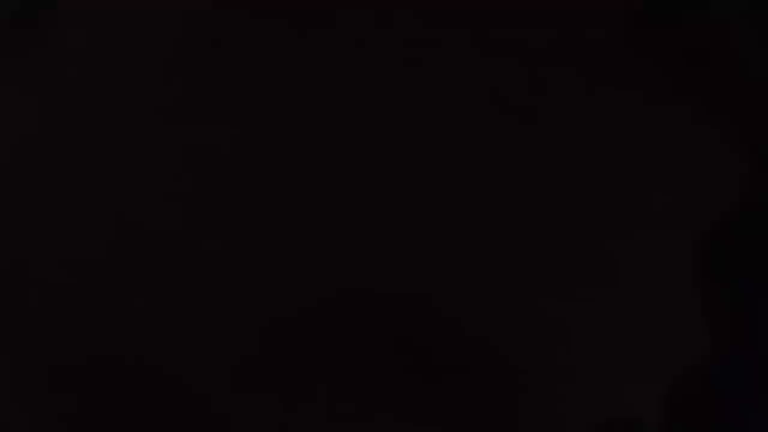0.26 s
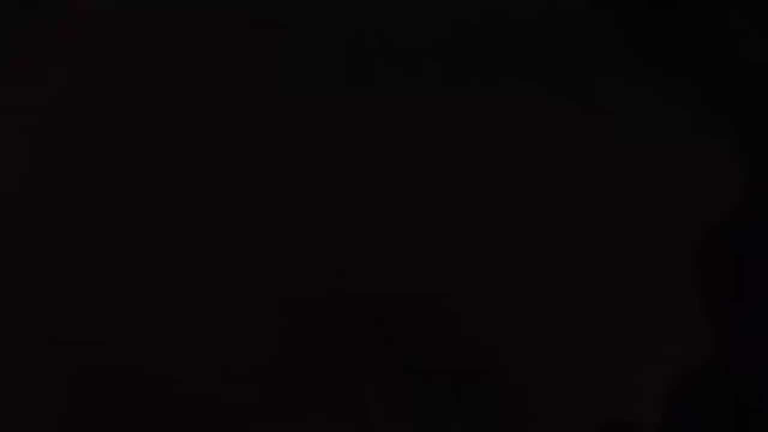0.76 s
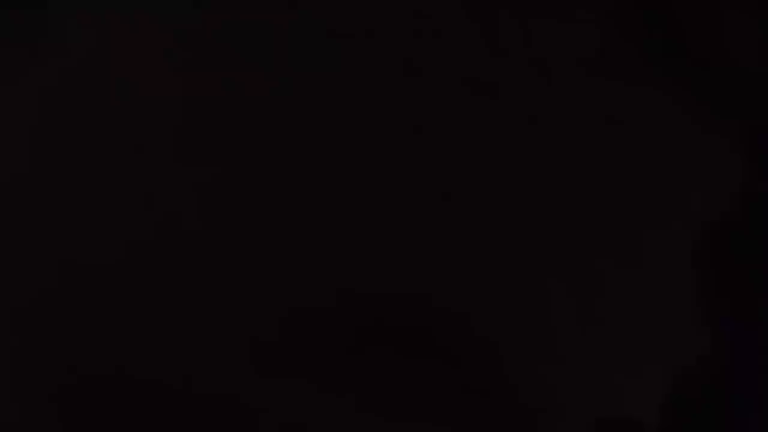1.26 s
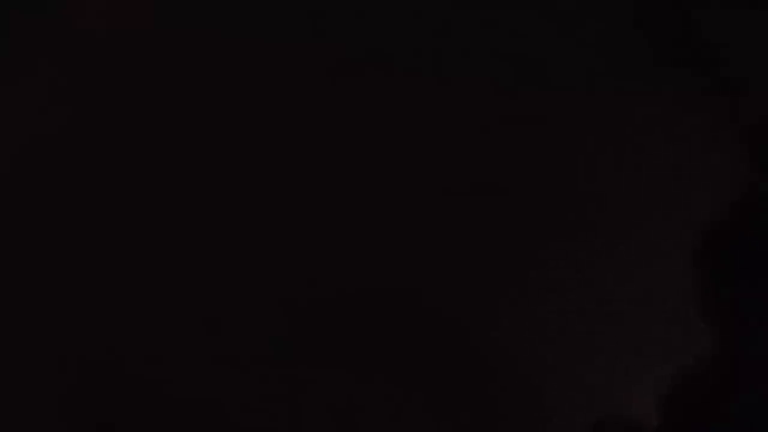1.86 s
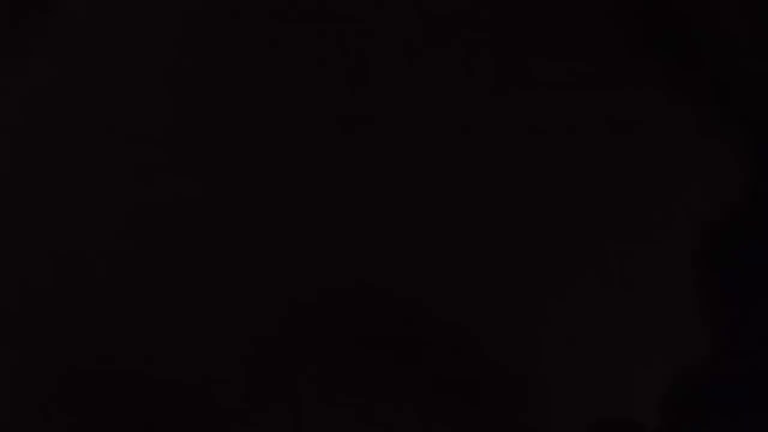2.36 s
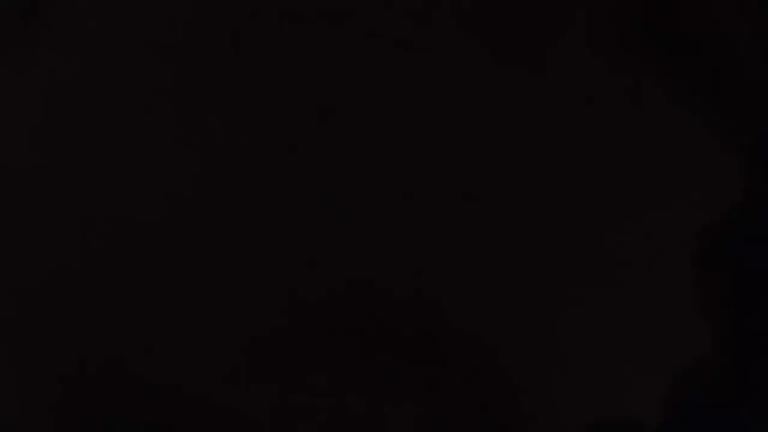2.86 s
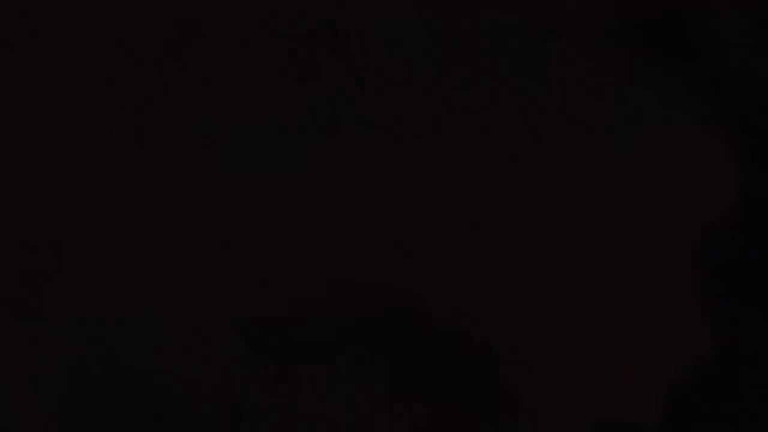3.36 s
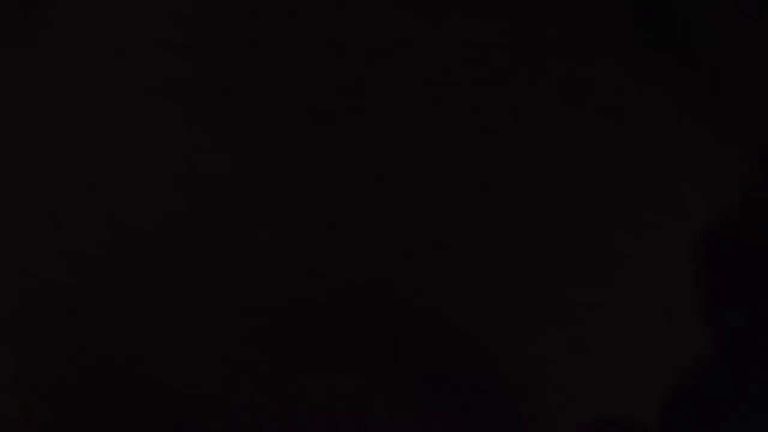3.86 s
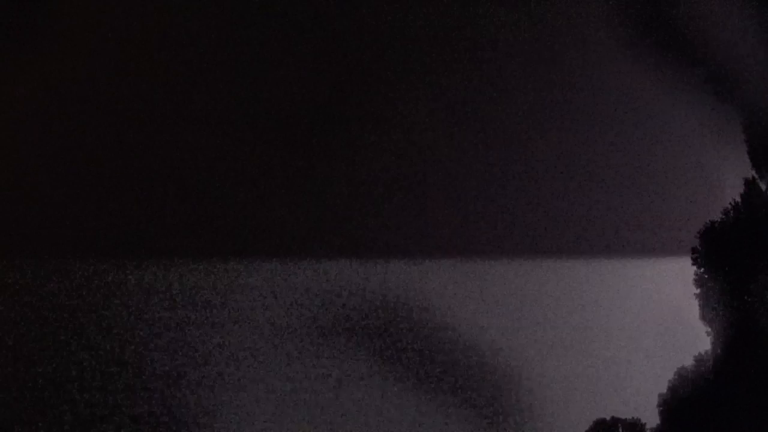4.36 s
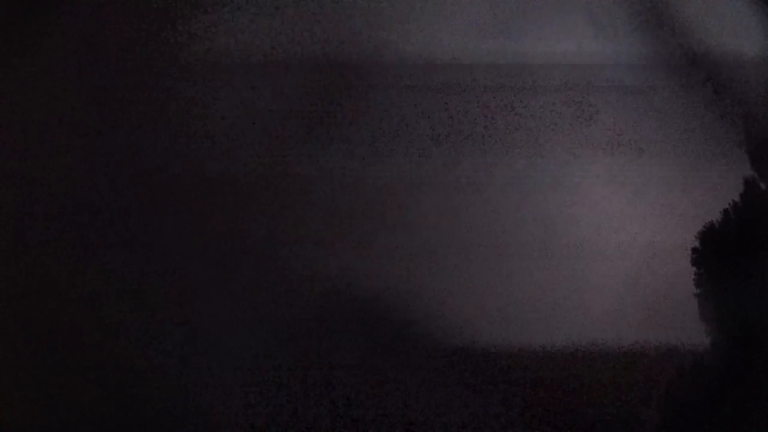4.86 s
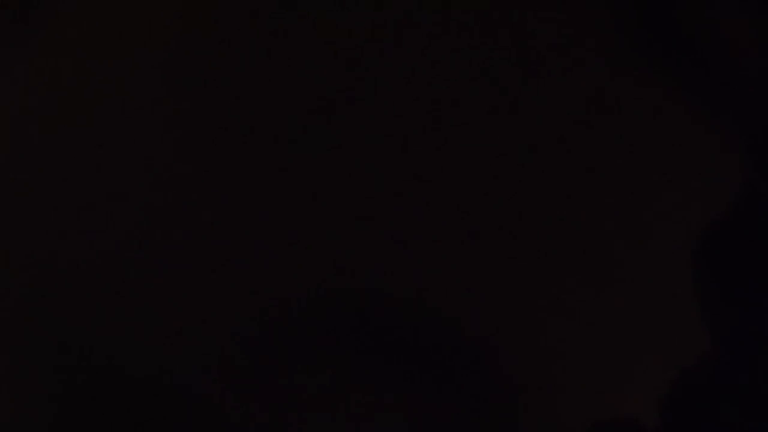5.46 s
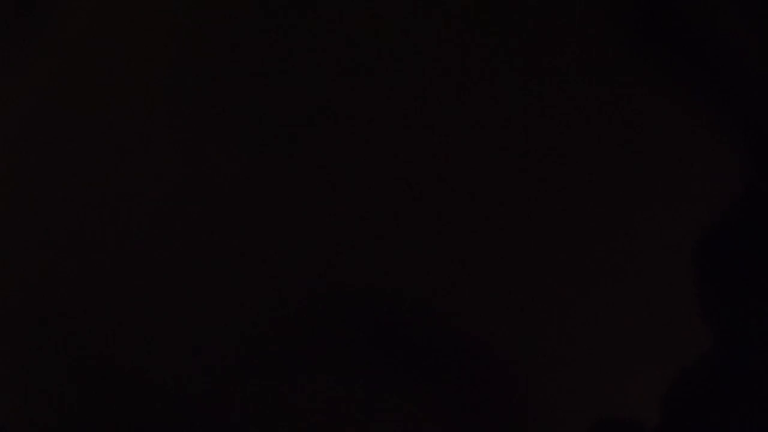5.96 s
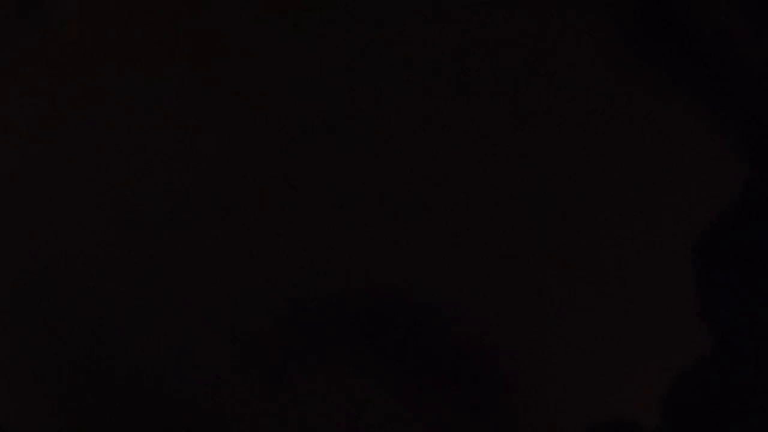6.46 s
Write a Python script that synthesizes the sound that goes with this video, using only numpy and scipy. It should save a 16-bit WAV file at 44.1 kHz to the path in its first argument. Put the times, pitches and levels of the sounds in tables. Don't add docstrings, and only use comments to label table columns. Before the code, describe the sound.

Outdoors at night under a small shelter, steady rain hisses evenly. Deep distant thunder rolls in soft, overlapping surges. Stray drops tick sharply, knock on a hollow panel, and thump the microphone, hard at about one second. After five seconds the thunder comes nearer, growling and crackling, still going when the sound stops with another hard drop thump.

```python
import sys
import numpy as np
from scipy import signal
from scipy.fft import rfft, irfft, next_fast_len
from scipy.io import wavfile
from scipy.ndimage import uniform_filter1d, map_coordinates

SR = 44100
rng = np.random.default_rng(int(sys.argv[2]) if len(sys.argv) > 2 else 0)


def gain_from_db(level_db):
    decades = np.asarray(level_db, float) / 20
    return 10 ** decades


def generate_wav(signal):
    frames = np.transpose(np.atleast_2d(signal))
    scaled = np.clip(frames, -1, 1) * 32767
    pcm = np.round(scaled).astype(np.int16)
    wavfile.write(sys.argv[1], SR, pcm)


N = 296352
BAND_LIMIT_HZ = 11065


def unit(x):
    return x / np.sqrt(np.mean(x ** 2) + 1e-20)


def along(points, hz):
    f, v = np.transpose(points)
    return np.interp(np.log(hz + 1), np.log(f + 1), v)


def curves(rows):
    s, *cols = np.transpose(rows)
    t = np.arange(N) / SR
    return [np.interp(t, s, c) for c in cols]


def wobble(rate):
    knots = rng.standard_normal(int(N * rate / SR) + 4)
    return map_coordinates(knots, [np.arange(N) * rate / SR])


def filtered(x, response):
    m = next_fast_len(N + SR // 2)
    hz = np.fft.rfftfreq(m, 1 / SR)
    return irfft(rfft(x, m) * response(hz), m)[..., :N]


def band_limit(hz):
    return 1 / (1 + (hz / BAND_LIMIT_HZ) ** 90)


def impacts(rate, spread_db, hush):
    chance, sign, size = rng.random((3, 2, N))
    size_db = spread_db * np.minimum(-np.log(1 - size), 3)
    train = (chance < rate / SR) * np.sign(sign - .5) * gain_from_db(size_db)
    hush = np.clip(hush, 0, 1)
    return np.sqrt(1 - hush) * unit(train) + np.sqrt(hush) * rng.standard_normal((2, N))


# (frequency [Hz], left-right likeness [0-1])
COHERENCE = [(60, 0.91), (110, 0.98), (190, 0.91), (350, 1), (630, 0.7), (1120, 0.29), (2020, 0.59),
             (3630, 0.88), (6520, 0.58), (11700, 1)]
# (frequency [Hz], lead of the left [rad])
PORT_LEAD = [(50, -0.11), (120, 0.04), (430, -1.22), (1460, -0.31), (2200, -1.15), (3800, -0.78),
             (10000, 0.9)]
# (frequency [Hz], left over right [dB])
PORT_TILT = [(60, -2), (110, -2.5), (190, -2.0), (350, -0.5), (630, -2.5), (1120, -2), (2020, -0.5),
             (3630, -2.5), (6520, -1.5), (11700, -0.5)]


def spread(pair, spectrum):
    def mid_side(hz):
        angle = np.arccos(np.clip(along(COHERENCE, hz), -1, 1)) / 2
        return gain_from_db(along(spectrum, hz)) * [np.cos(angle), np.sin(angle)]

    def ports(hz):
        half = gain_from_db(along(PORT_TILT, hz) / 2) * np.exp(.5j * along(PORT_LEAD, hz))
        return np.array([half, 1 / half])

    mid, side = filtered(pair, mid_side)
    return unit(filtered(np.array([mid + side, mid - side]), ports))


def add(out, s, sound):
    part = out[:, round(s * SR):][:, :sound.shape[1]]
    part += sound[:, :part.shape[1]]


def patchy(pair, depth_db, size):
    z = signal.stft(pair, nperseg=size)[2]
    field = uniform_filter1d(rng.standard_normal(z.shape[1:]), size=7, axis=0)
    field = uniform_filter1d(field, size=10, axis=1)
    return signal.istft(z * gain_from_db(depth_db * unit(field)), nperseg=size)[1][:, :N]


# (time [s], level [dB])
RAIN_LEVEL = [(0.0, -38), (1.29, -37.5), (4.51, -37.5), (6.31, -37), (6.72, -37)]
# (frequency [Hz], density [dB per Hz])
RAIN_SPECTRUM = [(180, -55), (300, -3.5), (334, -8.5), (377, -6.5), (473, -2.5), (630, -4), (701, -7.5),
                 (1340, -4), (1450, -3.5), (1900, -2.5), (2220, -2), (3140, -2.5), (8660, -10.5),
                 (10100, -14), (11200, -16.5), (14600, -78), (22000, -120)]


def rain():
    drops = patchy(impacts(1500, 6.5, hush=0.88), 0.62, size=256)
    hiss = filtered(spread(drops, RAIN_SPECTRUM), band_limit)
    return gain_from_db(curves(RAIN_LEVEL)[0] + 0.17 * wobble(14) + 3.0) * hiss


def splashes(rows, life, rise, gain_db):
    out, t = np.zeros((2, N)), np.arange(SR // 25) / SR
    for s, db, hz, pan_db, share in rows:
        t60 = life(hz)
        spray = rng.standard_normal((3, len(t)))
        phase = 2 * np.pi * hz * t + np.array([[.3], [-.3]])
        tone = np.sin(phase) + .3 * np.sin(.84 * phase) + .3 * np.sin(1.25 * phase)
        tone = tone + share * (spray[0] + .3 * spray[1:])
        fall = gain_from_db(-60 * t / t60) + gain_from_db(-27 - 60 * t / (5 * t60))
        fade = gain_from_db(db + gain_db) * fall * (1 - np.exp(-t / rise)) ** 2
        add(out, s + .0005, fade * tone * gain_from_db([[pan_db / 2], [-pan_db / 2]]))
    return out


# (time [s], peak [dB], pitch [Hz], left over right [dB], spray share [0-1])
SPLAT_DROPS = [(.238, -15, 2560, -3, .05), (.238, -20, 1797, -7, .05), (.2385, -23, 2200, -4, .05),
               (.2384, -25, 5200, .1, .05), (1.0809, -28.5, 2960, -12, .05), (2.8764, -26.5, 3160, -5, .05),
               (4.1495, -24, 1910, 5, .05), (4.1500, -22.5, 3400, -2, .05), (4.151, -24, 5000, 2.1, .05),
               (5.3622, -28, 2520, -6, .05), (6.5405, -27.5, 2190, -12, .3)]


def splats():
    return splashes(SPLAT_DROPS, lambda hz: .013, rise=.0002, gain_db=3)


# (time [s], peak [dB], pitch [Hz], left over right [dB], spray share [0-1])
TICK_DROPS = [(0.101, -11.5, 8400, -1.0, .4), (0.2382, -17.5, 5230, 1.1, 0.53),
              (0.7775, -21, 5000, -1.0, .2), (1.0715, -24, 6070, -7, 0.97), (1.7534, -14, 6370, -7, 0.66),
              (2.0871, -19, 7660, -2.5, .4), (2.2842, -9.5, 6800, -0.5, .45), (2.5155, -15, 8700, -1.0, .7),
              (2.7376, -26, 5500, -9, .4), (3.4344, -21, 5500, -1.0, 0.78), (3.7213, -8.5, 7430, -6, 0.34),
              (4.0052, -23, 5100, 4, .2), (4.1494, -8, 5140, 6, 0.19), (5.3621, -26, 4950, -1.0, .2),
              (5.7132, -17, 6500, 4, 0.37), (6.0715, -23, 6500, -1.5, .6), (6.54, -22, 4900, 7, 0.52)]


def ticks():
    return splashes(TICK_DROPS, lambda hz: 13 / hz, rise=.0003, gain_db=12)


# (time [s], peak [dB], pitch [Hz], lean of the push [rad], lag
# of the right [ms])
LOW_PULSES = [
    (.233, -15.5, 210, -2.2, -1.0),
    (.516, -20, 90, -1.3, -.4),
    (1.0723, -7.5, 440, -.5, .6),
    (3.8712, -10.5, 275, .1, .9),
    (6.0, -19, 200, .1, -.4),
    (6.5417, -14, 1000, 0, .55),
    (6.5443, -8.5, 320, -1.45, .35),
]


def thuds():
    out, t = np.zeros((2, N)), np.arange(-SR // 50, SR // 50) / SR
    for s, db, hz, lean, lag_ms in LOW_PULSES:
        cycles = hz * (t - np.array([[0], [lag_ms / 1000]]))
        push = np.exp(-(cycles / .48) ** 2) * np.cos(2 * np.pi * cycles + lean)
        add(out, s + t[0], gain_from_db(db) * push)
    return out


# (frequency [Hz], decay by 60 dB [s], rise [s], lead of the left [rad])
PANEL_MODES = [(368, 0.049, 0.0024, -4.3), (833, 0.059, 0.0016, -1.96), (1320, 0.019, .0006, -2),
               (1510, 0.032, 0.0012, -2.0)]
# (time [s], then the peak of each mode in turn [dB])
PANEL_DROPS = [(0.238, -37.5, -41, -19.5, -30.5), (0.357, -47, -45, -43, -29),
               (0.78, -21.5, -29.5, -18, -17), (1.081, -46, -21, -39, -16.5), (1.259, -49, -34.5, -31, -43),
               (1.479, -45, -59, -45, -39), (2.878, -52, -45, -21.5, -22), (2.94, -37, -43, -31, -38),
               (3.059, -45, -50, -47, -36), (3.436, -44, -40, -45, -28.5), (3.55, -53, -35, -33, -41),
               (4.005, -30.5, -27.5, -18, -23.5), (4.15, -22.5, -16.5, -10.5, -30),
               (4.384, -53, -45, -26, -33), (5.362, -44, -36, -20, -17), (5.713, -35, -38, -34.5, -27),
               (6.072, -34, -43, -39, -45)]


def knocks():
    out, t = np.zeros((2, N)), np.arange(SR // 8) / SR
    for s, *strength_db in PANEL_DROPS:
        for (hz, t60, rise, lead), mode_db in zip(PANEL_MODES, strength_db):
            detuned_hz = hz * (1 + 0.007 * rng.standard_normal())
            phase = 2 * np.pi * detuned_hz * t + np.array([[lead / 2], [-lead / 2]])
            fade = gain_from_db(mode_db + 8.0 - 60 * t / t60) * (1 - np.exp(-t / rise))
            add(out, s, fade * np.sin(phase) * gain_from_db([[-.8], [.8]]))
    return out


# (time [s], level [dB], nearness [0 far - 1 near])
ROLLING_BED = [(0, -42.5, 0.19), (.4, -41, 0.22), (1.2, -40, 0.073), (1.6, -43.5, 0.16), (2.3, -45, 0.24),
               (2.9, -43, 0.091), (3.6, -44.5, 0.2), (4.2, -43.5, 0.34), (4.8, -45.5, 0.18),
               (5.1, -39.5, .55), (5.45, -40.5, 0.43), (5.9, -41.5, 0.38), (6.1, -38, 0.92),
               (6.35, -41, .95), (6.5, -39, 0.96), (6.72, -37, 0.69)]
FAR_LEVEL = [2, 3.5, -2.5, -12.5]
NEAR_GAIN = [-3, 0, 4.5, 15.5]
LAYER_PLACE = [0, .9, 1.7, 3.2]
# (time [s], peak [dB], brightness above the boom
# [octaves], length [s])
THUNDER_CLAPS = [(0.202, -36.5, 0.11, .1), (0.38, -38, 1.1, 0.11), (.5, -45, 2.1, 0.11),
                 (0.753, -42, .2, 0.066), (0.933, -29, 0.34, 0.045), (0.995, -35, 0.37, 0.056),
                 (1.24, -35, 0.54, .07), (1.267, -41, 1.7, 0.094), (1.382, -37, 0.56, .07),
                 (1.966, -38, 0.88, 0.054), (2.195, -39.5, 2.1, 0.085), (2.447, -34, 0.59, 0.078),
                 (2.63, -42, .1, 0.06), (2.754, -32, 0.33, 0.069), (2.875, -36.5, 0.22, 0.072),
                 (3.125, -35, 0.29, 0.13), (3.303, -39, 1, .05), (3.487, -37.5, .1, 0.12),
                 (3.78, -45, 0.39, 0.095), (4.34, -39, 0.084, 0.12), (4.5, -38.5, 0.82, 0.067),
                 (4.85, -40.5, 1.6, 0.045),
                 (4.99, -31, 0.54, 0.061), (5.106, -35, 1.2, .04), (5.18, -43, 3.1, .06),
              (5.196, -28.5, 0.53, .04), (5.4, -37, .9, .06), (5.574, -31.5, .3, .04),
              (5.682, -40.5, 3.1, 0.083), (5.806, -35, 2.4, 0.059), (6.008, -33.5, .5, 0.037),
              (6.083, -32, 1.1, .04), (6.04, -37.5, 3.1, 0.036), (6.112, -33, 3.1, .04),
              (6.172, -25, 2.33, 0.027), (6.17, -31, 3.5, 0.027), (6.268, -28, 1.5, .045),
              (6.273, -29, 3.1, 0.037), (6.34, -27.5, 0.88, 0.035), (6.36, -32.5, 3.2, 0.049),
              (6.375, -32, 1.2, .02), (6.524, -27.5, 1.8, 0.033), (6.623, -34, 1.3, .03),
              (6.649, -31.5, 3.1, 0.028), (6.66, -29.5, 2, 0.033), (6.7, -30, 1.1, .025)]


def peals():
    clap_octaves, rise_over_fall = 0.45, 0.86
    level_db, near = curves(ROLLING_BED)
    bed = gain_from_db(2 * (level_db + np.c_[FAR_LEVEL] + near * np.c_[NEAR_GAIN]))
    s, db, bright, length = (np.c_[column] for column in np.transpose(THUNDER_CLAPS))
    clock = np.linspace(0, N / SR, 3000)
    width = length * np.where(clock < s, rise_over_fall, 1)
    swell = gain_from_db(2 * db) * np.exp(-2 * ((clock - s) / width) ** 2)
    reach = np.exp(-((np.c_[LAYER_PLACE] - bright.T) / clap_octaves) ** 2 / 2)
    claps = curves(np.c_[clock, (reach @ swell).T])
    return 10 * np.log10(bed + claps)


# (frequency [Hz], density [dB per Hz])
BOOM_SPECTRUM = [(12, -44), (20, -18.5), (70, -1), (120, 0.5), (160, -20), (260, -120)]
ROLL_SPECTRUM = [(62, -23), (105, -7), (162, 3), (240, -7), (310, -40), (530, -120)]
GROWL_SPECTRUM = [(130, -14.5), (225, -2.5), (280, -1.5), (328, -5), (362, -5.5), (500, -22), (650, -33),
                  (1100, -120)]
CRACKLE_SPECTRUM = [(260, -37), (450, -9), (485, -28), (553, -6.5), (708, -2), (1010, -3), (1150, -9.5),
                    (1240, -7.5), (1500, -32), (1950, -50), (3300, -120)]


def thunder():
    boom_db, roll_db, growl_db, crackle_db = peals()
    cluster = wobble(30)
    boom_db = boom_db + 0.85 * wobble(9) + 1.4
    roll_db = roll_db + 0.73 * wobble(12) - 1.8
    growl_db = growl_db + 0.81 * cluster + 1.36 * wobble(25) - 0.07
    crackle_db = crackle_db + 0.86 * cluster + 0.51 * wobble(60) + 1.2
    boom = gain_from_db(boom_db) * spread(impacts(60, 1.2, hush=0.76), BOOM_SPECTRUM)
    roll = gain_from_db(roll_db) * spread(impacts(200, 3.1, hush=0.74), ROLL_SPECTRUM)
    growl = gain_from_db(growl_db) * spread(impacts(300, 2.2, hush=0.7), GROWL_SPECTRUM)
    crackle = gain_from_db(crackle_db) * spread(impacts(450, 2.5, hush=.45), CRACKLE_SPECTRUM)
    return boom + roll + growl + crackle


# (time [s], depth [dB])
LIMITER_DIPS = [
    (1.074, 7),
    (6.544, 11),
]


def limiter_gain():
    t, recovery_s = np.arange(N) / SR, .022
    dip_db = sum(db * (t > s) * np.exp(-np.maximum(t - s, 0) / recovery_s) for s, db in LIMITER_DIPS)
    return gain_from_db(-uniform_filter1d(dip_db, size=90))


def scene():
    storm = limiter_gain() * (rain() + thunder())
    return storm + splats() + ticks() + thuds() + knocks()


def roll_off(x):
    return signal.sosfilt(signal.butter(12, 12320, fs=SR, output="sos"), x)


def record(dry):
    def passed(hz):
        leak = gain_from_db(-32) / (1 + (hz / 13000) ** 16)
        return band_limit(hz) + leak

    return roll_off(filtered(dry, passed))


dry = scene()
out = record(dry)
generate_wav(out)
```